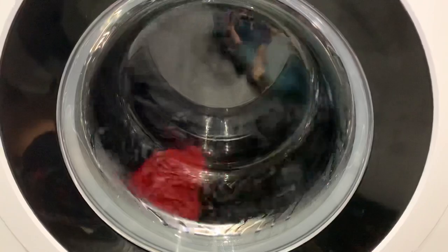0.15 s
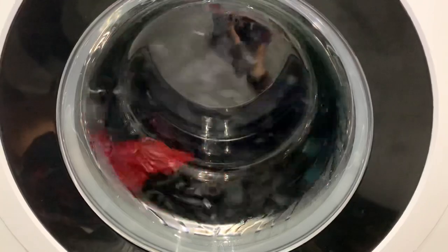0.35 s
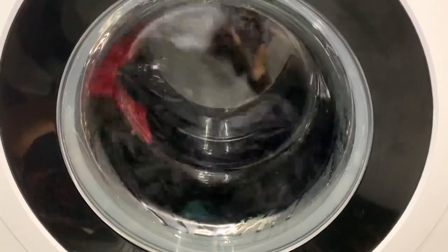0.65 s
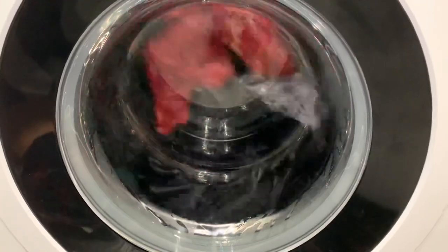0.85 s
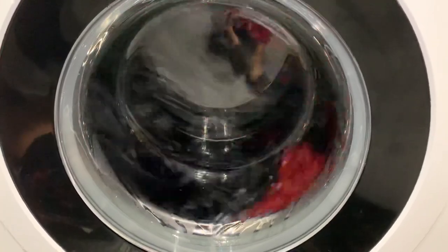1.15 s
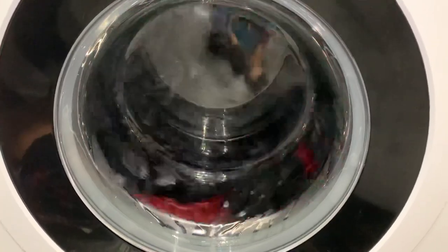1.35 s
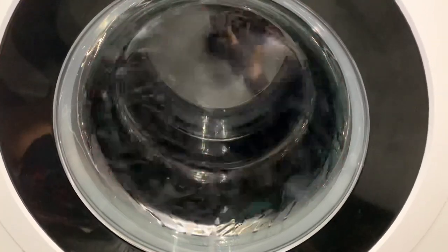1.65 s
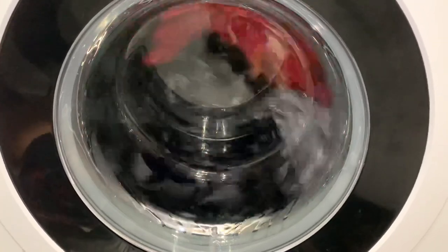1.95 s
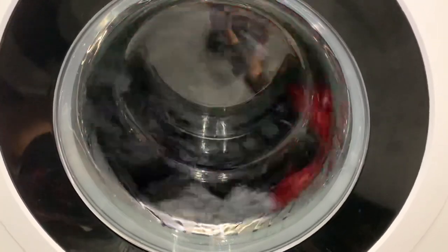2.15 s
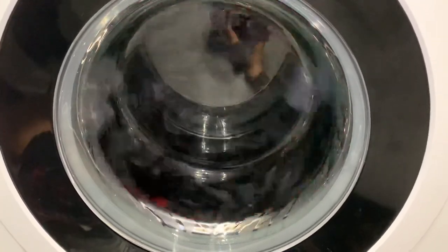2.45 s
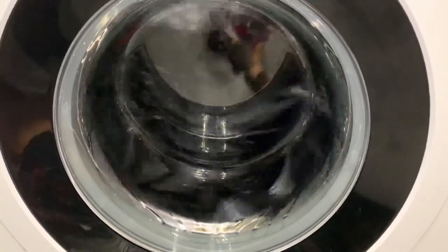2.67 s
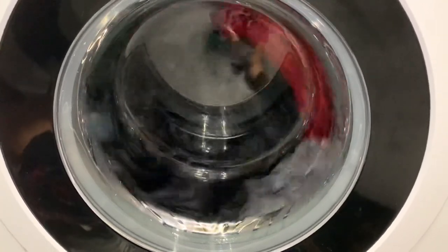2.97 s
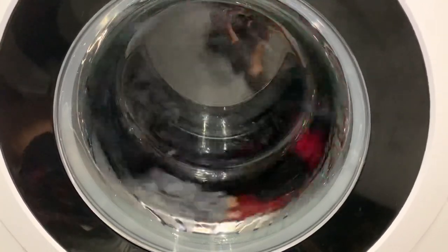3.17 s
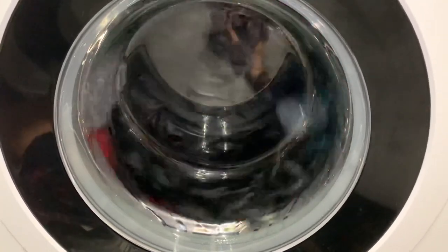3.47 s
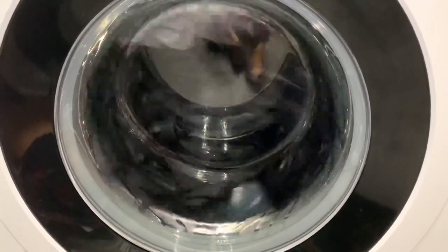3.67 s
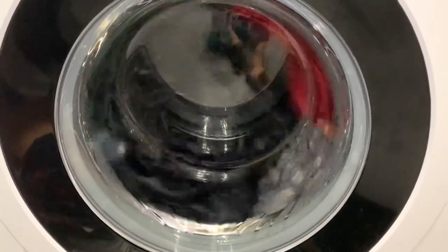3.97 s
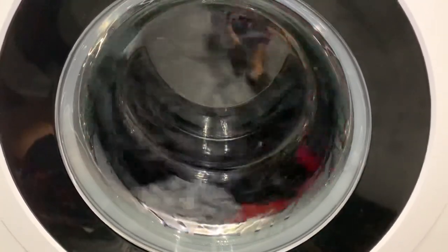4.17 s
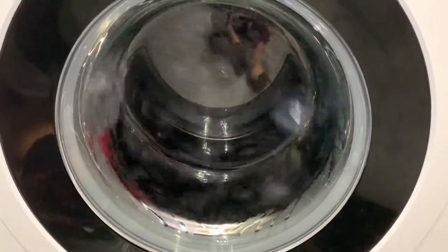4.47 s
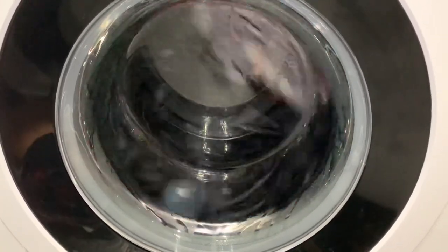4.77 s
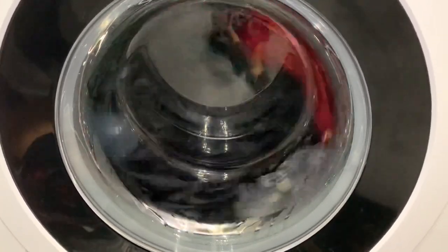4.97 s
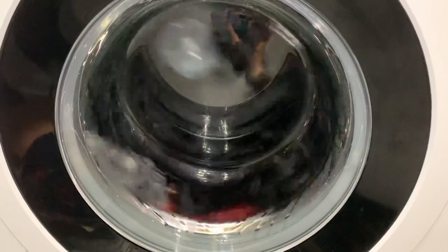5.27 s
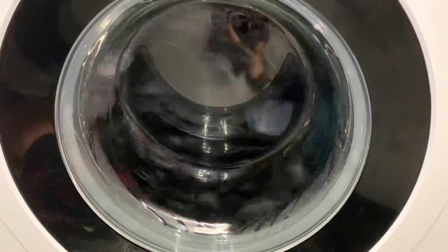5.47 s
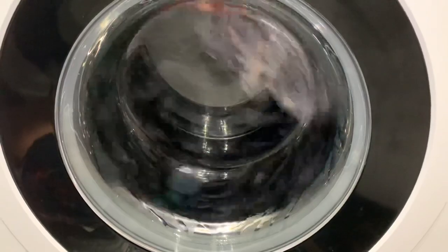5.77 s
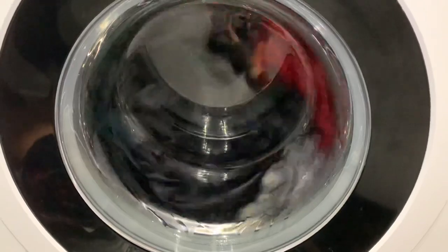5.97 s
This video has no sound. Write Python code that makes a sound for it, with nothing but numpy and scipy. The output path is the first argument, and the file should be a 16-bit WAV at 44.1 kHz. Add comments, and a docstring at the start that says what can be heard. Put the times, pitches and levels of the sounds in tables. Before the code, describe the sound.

A washing machine drum turns wet laundry, water sloshing and cloth flopping while something hard knocks sharply on the door glass about once a second.

```python
"""A front-loading washing machine turns a wet load, heard close to the door in a small hard room.
About once a second a hard fastening knocks on the door glass, exciting damped modes of glass, frame and tub,
and later clicks against it higher up. Wet laundry flops and slaps as shaped noise with gulping air pockets;
water sloshes as uneven noise with ringing bubbles, over the low-passed noise of the rumbling drive.
Short tinks, rustles and squeaks come from zips, buttons and cloth; a faint hiss is steady."""
import sys
import numpy as np
from scipy import signal
from scipy.fft import rfft, irfft, next_fast_len
from scipy.io import wavfile
from scipy.ndimage import uniform_filter1d, map_coordinates

SR = 44100
rng = np.random.default_rng(int(sys.argv[2]) if len(sys.argv) > 2 else 0)


def digitize_waveform(pressure):
    """Quantize a signal to 16-bit integers and store it at the path in sys.argv[1].

    Rows of a 2-D input are taken as channels; values are limited to [-1, 1].
    """
    field = np.atleast_2d(pressure).T
    bounded = np.clip(field, -1, 1)
    quanta = np.round(bounded * 32767).astype(np.int16)
    wavfile.write(sys.argv[1], SR, quanta)


N = 269892  # samples in the scene
RING_T = np.arange(int(SR * .7)) / SR  # time axis of one impact, s


def amp(db):
    """Logarithmic level: decibels to gain."""
    return 10 ** (np.asarray(db) / 20)


def unit(x):
    """Root-mean-square level: scale to rms 1."""
    return x / np.sqrt(np.mean(x ** 2) + 1e-20)


def blow(x, count=441):
    """Short-time level: scale so that the loudest stretch of count samples has rms 1."""
    power = np.mean(np.atleast_2d(x) ** 2, axis=0)
    return x / np.sqrt(uniform_filter1d(power, count, mode="constant").max())


def along(points, hz):
    """Interpolation of (Hz, value) points on a logarithmic frequency axis."""
    f, v = np.transpose(points)
    return np.interp(np.log(hz + 1), np.log(f + 1), v)


def wobble(rate):
    """Slow random modulation: a smooth random curve with rate knots a second."""
    knots = rng.standard_normal(int(N * rate / SR) + 4)
    return map_coordinates(knots, [np.arange(N) * rate / SR])


def filtered(x, response):
    """Linear filtering: multiply the spectrum of x by a response of frequency."""
    n = x.shape[-1]
    m = next_fast_len(n + SR // 8)
    return irfft(rfft(x, m) * response(np.fft.rfftfreq(m, 1 / SR)), m)[..., :n]


def narrow_band(centre_hz, half_width_hz):
    """Resonant filtering: stereo noise confined near one frequency, 6 dB down at the half width."""
    white = rng.standard_normal((2, len(RING_T)))
    return filtered(white, lambda hz: 1 / (1 + ((hz - centre_hz) / half_width_hz) ** 2))


# Coherence of the two channels. Each row: frequency in Hz, left-right correlation.
CHANNEL_LIKENESS = [(60, 0.9819), (130, 0.9363), (290, 0.93645), (640, 0.3365), (1400, 0.045),
                    (6000, 0.015)]


def noise(spectrum, size, tilt_db=0):
    """Partial coherence: coloured stereo noise of rms 1, alike in the bass and unrelated in the treble."""
    def turn(hz):
        return np.arccos(np.clip(along(CHANNEL_LIKENESS, hz), -1, 1)) / 2

    def response(hz):
        colour = amp(along(spectrum, hz) + tilt_db * np.log2(hz / 1000 + 1 / 20))
        return colour * [np.cos(turn(hz)), np.sin(turn(hz))]

    mid, side = filtered(rng.standard_normal((2, size)), response)
    return unit(np.array([mid + side, mid - side]))


def fade(t60):
    """Exponential damping: a decay of 60 dB in t60 seconds."""
    return np.exp(-np.log(1000) * RING_T / t60)


def onset(attack):
    """Finite contact time: an exponential rise with time constant attack in seconds."""
    return 1 - np.exp(-RING_T / attack)


def ring(modes, attack, tilt_db=0, scatter_db=2):
    """Modal superposition: damped modes whose strengths scatter with the point that is struck."""
    out = np.zeros((2, len(RING_T)))
    for hz, db, t60, *lead in modes:
        phase = rng.uniform(0, 2 * np.pi) + sum(lead) * np.array([[.5], [-.5]])
        strength = amp(db + tilt_db * np.log2(hz) + scatter_db * rng.normal())
        out += strength * fade(t60) * np.sin(2 * np.pi * hz * RING_T + phase)
    return blow(out * onset(attack))


# Reverberation time of the room. Each row: frequency in Hz, 60 dB decay time in seconds.
ROOM_DECAY = [(100, 0.622), (400, 0.31467), (1000, 0.56056), (2000, 0.5559), (4000, 0.5766), (7000, 0.4293),
              (11000, 0.3164), (16000, 0.3024)]
# Colour of the reverberation. Each row: frequency in Hz, relative level in dB.
ROOM_TINT = [(100, -4), (400, -1.5), (1000, 4), (1420, -7), (1700, -1), (1900, 0.5), (2200, -0.5),
             (3400, -1.5), (3760, -3.5), (4100, -1), (7000, -6.5), (8500, -19.5), (10500, -5.5),
             (15500, -16)]


def in_room(x, wet_db):
    """Reverberation: convolve with a noise tail in which each frequency dies at its own speed."""
    hz, t, z = signal.stft(noise([(20, 0), (20000, 0)], len(RING_T)), SR, nperseg=256)
    decay = np.exp(-np.log(1000) * t / along(ROOM_DECAY, hz)[:, None])
    tail = signal.istft(z * decay, SR, nperseg=256)[1][:, :len(RING_T)]
    tail = filtered(tail / np.linalg.norm(tail[0]), lambda f: amp(along(ROOM_TINT, f)))
    tail = tail * onset(0.001883)
    return x + amp(wet_db) * signal.fftconvolve(x, tail, axes=1)[:, :len(RING_T)]


def add(track, s, x):
    """Superposition: mix x into the track at s seconds."""
    part = track[:, max(round(s * SR), 0):][:, :x.shape[1]]
    part += x[:, :part.shape[1]]


# Once a turn the load drops and sends a surge through the tub.
# Each row: start in seconds, surge in dB.
LOAD_DROPS = [(1.56, 1), (2.52, 3.5), (3.5, 2.5), (4.48, 1.5), (5.42, 2.5)]
SURGE_ATTACK_S, SURGE_HOLD_S, SURGE_RELEASE_S = 0.021, 0.59004, 0.04


def surges():
    """Level envelope in dB: at each drop of the load the swell rises quickly, holds and falls back."""
    corners = np.cumsum([0, SURGE_ATTACK_S, SURGE_HOLD_S, SURGE_RELEASE_S])
    t = np.arange(N) / SR
    return sum(db * np.interp(t - s, corners, [0, 1, 1, 0]) for s, db in LOAD_DROPS)


# Spectrum of the drive. Each row: frequency in Hz, relative dB per Hz.
DRIVE_SPECTRUM = [(15, -23.5), (25, -21.5), (45, 1), (62, 2), (78, 10), (100, 8), (135, -4), (175, 1),
                  (220, -24.5), (300, -38.5), (500, -120)]
# Bass level, which builds as the drum gets going. Each row: time in seconds, level in dB.
DRIVE_LEVEL = [(0, -62.5), (.85, -64), (1.0, -47.5), (1.1, -48.5), (1.22, -54.5), (1.4, -53.5), (3.8, -56),
               (4.301, -54.5), (4.65, -51), (6.12, -51)]
RUMBLE_SURGE_SHARE = 0.5845  # dB of swell per dB of surge


def rumble(surge_db):
    """Broadband machine noise: the drive rumbles in the bass and swells with the load."""
    level_db = np.interp(np.arange(N) / SR, *np.transpose(DRIVE_LEVEL))
    return amp(level_db + RUMBLE_SURGE_SHARE * surge_db + 1.3 * wobble(9)) * noise(DRIVE_SPECTRUM, N)


def patchy(x, depth_db, size=7, count=5):
    """Time-varying filtering: gain wanders in patches of time and frequency, as folds of cloth shift."""
    z = signal.stft(x, nperseg=512)[2]
    field = rng.standard_normal(z.shape[1:])
    for axis, width in ((0, size), (0, size - 2), (1, count), (1, count - 2)):
        field = uniform_filter1d(field, width, axis)
    return signal.istft(z * amp(depth_db * unit(field)), nperseg=512)[1][:, :N]


def hollow(x, depth_db, count=700):
    """Cavity resonance: the closed tub colours the water with many fixed, closely spaced ripples."""
    ripple = rng.standard_normal(count)
    places = np.linspace(0, 1, count)
    return filtered(x, lambda hz: amp(depth_db * np.interp(np.sqrt(hz / (SR / 2)), places, ripple)))


def bubbles(centre_hz, spread, size_db, rise, count):
    """Bubble resonance: air pockets squeezed out of the cloth ring briefly and rise in pitch."""
    out = np.zeros((2, N))
    t = RING_T[:SR // 16]
    draws = zip(rng.uniform(0, N / SR, count), rng.normal(size=count),
                rng.exponential(size=count), rng.normal(size=count))
    for when, pitch, size, side in draws:
        hz = np.clip(centre_hz * np.exp(spread * pitch), 200, 5000)
        age = t * hz / 7
        phase = 2 * np.pi * hz * t * (1 + rise * np.minimum(age, 4))
        tone = np.sin(phase) * np.exp(-age) * (1 - np.exp(-6 * age))
        # the small high ones are weaker
        level_db = size_db * min(size, 3) - 10.254 * np.log2(1 + (hz / centre_hz / 1.0657) ** 2)
        add(out, when, amp(level_db + 2 * side * np.array([[1], [-1]])) * tone)
    return unit(out)


# Spectrum of the moving water. Each row: frequency in Hz, relative dB per Hz.
WATER_SPECTRUM = [(82, -40), (140, -9), (171, -3), (212, -6), (413, -1), (586, -5), (935, -6.5),
                  (1300, -11), (1490, -14.5), (2900, -29), (3150, -25), (5650, -41.5), (6670, -45.5),
                  (7500, -45.5), (9750, -99), (16500, -120)]
# How hard the water is stirred; the load slips once, then the drum gets going.
# Each row: time in seconds, reference level in dB.
STIRRING = [(0, -59.5), (.38, -54.5), (.6, -65), (.76, -57), (0.979, -48.5), (1.3, -53), (1.65, -45.5),
            (2.8, -48.5), (3.25, -50), (4.3, -48), (5.0, -47), (6.12, -46)]
# levels against the stirring, dB; the spray swells by its own share, in dB per dB of surge
SLOSH_DB, BUBBLES_DB, FROTH_DB, SPRAY_DB, SPRAY_SWELL = -2, -8, -18, -16.5, 0.8224


def water(surge_db):
    """Turbulent flow noise: slosh in uneven surges, with bubbles, fine froth and a fine spray."""
    stir_db = np.interp(np.arange(N) / SR, *np.transpose(STIRRING))
    lapping = wobble(21)
    flow = hollow(patchy(noise(WATER_SPECTRUM, N), depth_db=2.1093), depth_db=3.0)

    def upper(hz):  # crossover at about 1800 Hz
        return 1 / (1 + (1800 / (hz + 1)) ** 4)

    body = unit(filtered(flow, lambda hz: 1 - upper(hz)) * amp(1.3 * lapping + 1.7 * wobble(70)))
    spray = unit(filtered(flow, upper) * amp(lapping + 0.69 * wobble(97)))
    froth = bubbles(centre_hz=2200, spread=.3, size_db=1.6, rise=.004, count=3200)
    froth = unit(froth * amp(2.0 * lapping))
    large = bubbles(centre_hz=804.53, spread=.6, size_db=2.5, rise=0.014246, count=1300)
    slosh = amp(SLOSH_DB) * body + amp(BUBBLES_DB) * large + amp(FROTH_DB) * froth
    # the surge lifts slosh, bubbles and froth in full, and the spray a little less
    spray = amp(SPRAY_DB + SPRAY_SWELL * surge_db) * spray
    return amp(stir_db) * (amp(surge_db) * slosh + spray)


def churn():
    """Common modulation: the same surges swell the drive and the water."""
    surge_db = surges()
    return rumble(surge_db) + water(surge_db)


# Spectrum of the steady hiss. Each row: frequency in Hz, relative dB per Hz.
HISS_SPECTRUM = [(1000, -21), (4000, -6), (7000, 3.5), (8300, -8.5), (9000, -4.5), (9900, 11.5), (12200, 3),
                 (13600, -4.5), (15300, 6), (16300, -4.5)]


def hiss():
    """Stationary noise: a faint hiss of constant level."""
    return amp(-80.0) * noise(HISS_SPECTRUM, N)


STRIKE_SCATTER_DB = 1.5  # spread of mode strengths from strike to strike
# Modes of the steel drum, damped by the load.
# Each row: frequency in Hz, relative level in dB, 60 dB decay time in seconds.
DRUM_MODES = [(1430, -3, .02), (1845, -2, .02), (2280, -3, .015), (3090, -6, .015), (3700, -4, .018),
              (5000, -2, .015), (6700, -2, .018), (10300, -10, .01), (12400, -15, .01)]
# Spectrum of the scratch at each touch. Each row: frequency in Hz, relative dB per Hz.
SCRATCH_SPECTRUM = [(600, -9.5), (1500, 5), (3200, -14.5), (5000, -10), (6700, -21), (8300, -26),
                    (10500, -9), (12500, -28), (16000, -29)]


def tink(tilt_db, scatter_db, count=3):
    """Repeated impact: a small fastening chatters drily on steel, a scratch and a short ring each touch."""
    out = np.zeros((2, len(RING_T)))
    gaps = rng.uniform(.003, 0.007, count)
    for k, when in enumerate(np.cumsum(gaps) - gaps[0]):
        modes = [(hz * (1 + .012 * rng.normal()), db, t60, rng.uniform(-1, 2.7))
                 for hz, db, t60 in DRUM_MODES]
        scratch = noise(SCRATCH_SPECTRUM, len(RING_T), tilt_db) * fade(0.02035) * onset(0.00074)
        touch = ring(modes, 0.000616, tilt_db, scatter_db) + blow(scratch)
        add(out, when, amp(-4.5 * k) * touch)
    return blow(out)


# The clearest tinks deep in the steel drum.
# Each row: start in seconds, level in dB, treble tilt in dB per octave.
CLEAR_TINKS = [(.088, -65, -9), (0.203, -60, 0), (0.325, -59.5, -9.5), (0.704, -56.5, 2), (0.725, -57.5, 0),
               (0.766, -56.5, -5), (0.799, -58, 2.5), (.814, -63.5, 4), (.835, -61, -1),
               (0.866, -48.5, -8.5), (.915, -59, -4), (.959, -53, -1), (.975, -59, 0.5), (1.062, -52.5, 2),
               (1.083, -62, -2), (1.289, -62, 0.5), (1.799, -57.5, 5), (2.168, -56, -0.5), (2.65, -61, 0),
               (4.165, -71, 4.5), (5.566, -56, -1.5), (6.008, -54, 0.5)]


def rattle(count=12):
    """Impact excitation: zips and buttons touch the drum in clear tinks, with count faint ones at random."""
    out = np.zeros((2, N))
    for s, db, tilt_db in CLEAR_TINKS:
        add(out, s, amp(db) * in_room(tink(tilt_db, STRIKE_SCATTER_DB), wet_db=-0.5))
    for when, size in zip(rng.uniform(0, N / SR, count), rng.normal(size=count)):
        add(out, when, amp(-68.5 + 2 * size) * tink(tilt_db=1.5, scatter_db=2.2))
    return out


# Wet cloth chirps against the rubber door seal. Each row: start in seconds, level in dB.
SEAL_CHIRPS = [(.18, -85), (.515, -64), (0.773, -58.5), (0.899, -58.5), (1.214, -60.5), (1.598, -61)]
SQUEAK_HZ, SQUEAK_HALF_WIDTH_HZ, SQUEAK_S = 3087.8, 63.8, 0.02042


def squeaks():
    """Stick-slip friction: a narrow, rough tone on the seal that swells and stops."""
    out = np.zeros((2, N))
    stroke = np.sin(np.pi * np.minimum(RING_T / SQUEAK_S, 1))
    for s, db in SEAL_CHIRPS:
        tone = narrow_band(SQUEAK_HZ, SQUEAK_HALF_WIDTH_HZ)
        add(out, s, amp(db) * in_room(blow(tone * stroke), wet_db=-7.0))
    return out


def grains(spectrum, per_s, spread_db, size=N):
    """Granular friction: tiny pops of uneven strength at random moments, each with its own place; rms 1."""
    count = int(per_s * size / SR) + 2
    when = rng.integers(0, size, count)
    strength = amp(spread_db * np.clip(rng.normal(size=count), -2, 2))
    mid, side = [np.bincount(when, strength * rng.uniform(-0.941, 1, count), size) for _ in range(2)]
    pops = np.array([mid + side, mid - side])
    burst = rng.standard_normal((2, SR // 100)) * fade(.008)[:SR // 100]
    crackle = signal.fftconvolve(pops, burst, axes=1)[:, :size]
    return unit(filtered(crackle, lambda hz: amp(along(spectrum, hz))))


# Spectral weighting of the crackle. Each row: frequency in Hz, relative dB per Hz.
RUSTLE_SPECTRUM = [(700, -21), (1800, 9), (2600, 2), (3800, 9.5), (5000, -1.5), (5900, -10), (6700, -12),
                   (8300, -20.5), (10500, -12.5), (16000, -20)]
# Cloth and zips dragged over the perforated drum.
# Each row: start in seconds, length in seconds, level in dB.
DRAGS = [(0.19, 0.03923, -74), (0.307, 0.0598, -66), (0.698, 0.07942, -68.5), (.79, 0.0676, -64.5),
         (0.863, 0.1497, -65), (1.055, 0.03365, -65)]


def rustles():
    """Sliding friction: cloth drags over the holes of the drum in a dry, uneven crackle."""
    out = np.zeros((2, N))
    for s, length, db in DRAGS:
        stroke = np.abs(np.sin(np.pi * np.minimum(RING_T / length, 1))) ** .5
        crackle = grains(RUSTLE_SPECTRUM, per_s=900, spread_db=3.5, size=len(RING_T))
        add(out, s, amp(db) * in_room(crackle * stroke, wet_db=-7.5))
    return out


# Modes of the sprung tub. Each row: frequency in Hz, relative level in dB, 60 dB decay time in seconds.
TUB_MODES = [(62.88, -4.5, 0.29), (75.77, -3.5, 0.2483), (100.39, -3.5, 0.498), (122.55, -7, 0.3895),
             (187.44, -7.5, 0.5114)]


def tub_boom(attack):
    """Mass on springs: the tub booms in a few low modes."""
    return ring(TUB_MODES, attack)


# Spectrum of wet cloth landing. Each row: frequency in Hz, relative dB per Hz.
WET_SPECTRUM = [(40, -22.5), (100, -19.5), (150, -10), (280, 0.5), (385, 5.5), (580, -19), (700, -2),
                (850, -29), (1080, -10), (1700, -28.5), (2500, -33), (3500, -45), (6500, -55.5),
                (9000, -89), (14000, -80.5)]
# Wet laundry landing. Each row: start in seconds, level in dB, treble tilt in dB per octave,
# pitch of the trapped air pocket in Hz.
LANDINGS = [(0.219, -52, -10.5, 313.2), (.402, -33, 3, 355.3), (0.935, -32.5, 1.5, 394.1),
            (1.345, -48.5, 5.5, 432), (1.489, -47, 7, 429.4), (1.612, -32.5, 2.5, 287.9),
            (1.681, -36.5, -2.5, 466.2), (2.535, -31.5, 0, 684.9), (3.661, -46.5, 4.5, 470.4),
            (3.915, -41, 5.5, 396.7), (4.03, -44, 6, 365.6), (4.693, -44.5, 1.5, 399.6),
            (5.025, -47.5, 7, 361.6), (5.425, -40, 4, 349.9), (5.655, -43, 5, 1117),
            (5.901, -43.5, 5, 469.9)]
FLOP_SWELL_S = 0.013255
FLOP_BOOM_DB = -20  # the sprung tub answers each landing


def flops():
    """Soft impact: the push of wet cloth swells and dies in the hollow tub, and a pocket of air gulps."""
    out = np.zeros((2, N))
    push = np.sqrt(RING_T / FLOP_SWELL_S) * np.exp(-RING_T / FLOP_SWELL_S / 1.2722)
    for s, db, tilt_db, pocket_hz in LANDINGS:
        slap = in_room(blow(noise(WET_SPECTRUM, len(RING_T), tilt_db) * push), wet_db=-1.5)
        pocket = ring([(pocket_hz, 0, .035), (pocket_hz * 0.96, -3, .03)], attack=FLOP_SWELL_S)
        boom = amp(FLOP_BOOM_DB) * tub_boom(attack=0.014)
        add(out, s, amp(db) * (slap + amp(-3.0) * pocket + boom))
    return out


# Spectrum of cloth on glass. Each row: frequency in Hz, relative dB per Hz.
SLAP_SPECTRUM = [(30, -46), (100, -25.5), (370, 17), (560, 12), (800, 5.5), (1120, 9.5), (1500, -10),
                 (1900, -13), (2700, -17.5), (3500, -35), (8000, -67.5), (16000, -69.5)]
# Sharp wet slaps of cloth on the glass.
# Each row: start in seconds, level in dB, treble tilt in dB per octave.
CLOTH_SLAPS = [(0.404, -37, 6.5), (.941, -38.5, 3), (1.6175, -41, 11.5), (1.624, -34, 4), (1.651, -45, 9),
               (2.534, -39, 3), (2.541, -28.5, -2.5), (2.547, -28, -9), (2.657, -47.5, -1.5),
               (3.416, -26.5, 0.5), (4.436, -28.5, 3.5), (4.466, -29.5, 6.5), (5.007, -43, -4.5),
               (5.328, -29, 9)]


def slaps():
    """Distributed impact: a sodden fold peels onto the glass, a noise burst with a fast random flicker."""
    out = np.zeros((2, N))
    for s, db, tilt_db in CLOTH_SLAPS:
        flicker = amp(2.519 * wobble(754.83)[:len(RING_T)])
        crackle = noise(SLAP_SPECTRUM, len(RING_T), tilt_db) * flicker * fade(0.04544) * onset(0.002616)
        add(out, s, amp(db) * in_room(blow(crackle), wet_db=-8))
    return out


# Larger air pockets that gulp on their own. Each row: start in seconds, level in dB, pitch in Hz.
AIR_POCKETS = [(0.797, -48, 334.6), (3.667, -43.5, 485.5)]


def gulps():
    """Air-cavity resonance: a larger pocket of air escapes with one round note."""
    out = np.zeros((2, N))
    for s, db, hz in AIR_POCKETS:
        add(out, s, amp(db) * in_room(ring([(hz, 0, .05)], attack=0.01264), wet_db=0))
    return out


# Modes of the door glass. Each row: frequency in Hz, relative level in dB, 60 dB decay time in seconds,
# phase lead of the left channel in radians.
GLASS_MODES = [(731.15, -16, 0.15244, 0.5), (848.5, -24, 0.011, -3.5), (925, -4, 0.0298, -1.5),
               (959.8, -15, 0.03567, -1.5), (1137.4, -3, 0.03199, 7.5), (1253.4, -3.5, 0.05509, -1.5),
               (1435.5, 12.5, 0.03258, 1), (1640, -21, 0.0051, -12), (1809.5, -1, 0.02422, -6.5),
               (1911.5, -2.5, 0.03886, -0.5), (2076.4, -12.5, 0.0787, -4.5), (2248.6, -2, 0.02037, 5.5),
               (2554.5, -8, 0.0299, -2), (3220, -28, 0.045, 4), (3644.3, -11, 0.0464, 7.5),
               (3780, -13, 0.02807, -5), (4402.8, -19.5, 0.0151, 1), (5514.2, -30.5, 0.022, 5),
               (5073.5, -32.5, 0.01151, -3), (6751.9, -25.5, 0.037, 1.5), (10355, -35.5, 0.00982, -5),
               (14500, -48.5, 0.018, 14)]


def glass_ring(attack, tilt_db, scatter_db=2, longest_t60=np.inf):
    """Plate vibration: the door glass rings in its modes, none longer than longest_t60 seconds."""
    modes = [(hz, db, min(t60, longest_t60), lead) for hz, db, t60, lead in GLASS_MODES]
    return ring(modes, attack, tilt_db, scatter_db)


# Spectrum of the sharp tick. Each row: frequency in Hz, relative dB per Hz.
TICK_SPECTRUM = [(500, -36), (1400, -47), (2400, -3), (4000, -5), (7000, 2.5), (8400, -6.5), (10300, 10.5),
                 (12300, 5.5), (13600, 1.5), (15200, 7), (16500, 3.5)]
# Modes of the metal fastening.
# Each row: frequency in Hz, relative level in dB, 60 dB decay time in seconds.
FASTENING_MODES = [(3680, -4, .014), (4300, -7, .008), (5030, 0, .016), (5350, -4, .01), (6300, -5, .012),
                   (6690, -5, .016)]


def click(tilt_db, metal_db):
    """Short contact time: a light touch rings the fastening and the high modes of the glass."""
    tick = blow(noise(TICK_SPECTRUM, len(RING_T), tilt_db) * fade(0.03312) * onset(0.0000751))
    # wet cloth lies against the glass and damps it
    glass = glass_ring(attack=0.0037, tilt_db=21 + tilt_db, longest_t60=.022)
    metal = ring(FASTENING_MODES, attack=0.001606, scatter_db=STRIKE_SCATTER_DB)
    return in_room(blow(tick + amp(-6.5) * glass + amp(metal_db) * metal), wet_db=-1.0)


def after_ring(centre_hz, half_width_hz, t60):
    """Beating: a narrow band of noise fades with the roughness of a tight cluster of modes."""
    return blow(narrow_band(centre_hz, half_width_hz) * fade(t60) * onset(0.00019))


# Spectrum of the crack and the skid. Each row: frequency in Hz, relative dB per Hz.
CRACK_SPECTRUM = [(40, -30), (200, -9), (600, -3), (1400, 13.5), (2000, 3), (3000, -30), (4000, -3.5),
                  (5500, -19), (8500, -36.5), (10500, -29.5), (16000, -81.5)]
# Modes of the door frame. Each row: frequency in Hz, relative level in dB, 60 dB decay time in seconds.
FRAME_MODES = [(299.21, -22.5, 0.4799), (355.96, -4.5, 0.10088), (382.28, 0, 0.08175),
               (475.63, -7.5, 0.03943), (537.33, -10, 0.08443)]
# Knocks on the door, with their small rebounds and lingering rings.
# Each row: start in seconds, glass level in dB, door frame level in dB, tub boom level in dB,
# hardness as treble tilt in dB per octave, sharp tick level in dB, then the metallic after-ring:
# centre in Hz, half width in Hz, level in dB, 60 dB decay time in seconds.
DOOR_KNOCKS = [(1.528, -45, -36, -31, -20, -42, 2435, 149.8, -49, 0.3491),
               (2.469, -34.5, -32, -38, -12, -43, 2474, 250, -49, 0.2005),
               (3.4134, -14, -25, -31, 2.5, -24.5, 3760, 109.2, -25.5, 0.1167),
               (3.425, -22.5, -31, -50, 1, -50, 1856, 130, -26, 0.2779),
               (3.4413, -35.5, -54.5, -43.5, 10, -55.5, 2424, 130, -33, 0.1091),
               (3.456, -41, -45, -40, 1.5, -59, 3751, 44.93, -43, 0.53),
               (3.472, -37, -43.5, -43.5, -3, -62.5, 1893, 89.7, -32.5, 0.369),
               (4.4335, -16.5, -24, -33.5, -2, -29, 2658, 329.5, -32.5, 0.1377),
               (4.4643, -26, -26, -31.5, -2.5, -34, 1830, 69.87, -34.5, 0.392),
               (4.825, -44.5, -54.5, -46, 0, -36.5, 5081, 200, -38.5, 0.04803),
               (5.3267, -14.5, -32.5, -42, 0.5, -35, 3684, 79.76, -29, 0.0269),
               (5.333, -32.5, -43.5, -46.5, -7, -48.5, 4446, 119.9, -40.5, 0.258),
               (5.3698, -24, -45, -56.5, -2.5, -42.5, 1988, 129.8, -38.5, 0.1882),
               (5.413, -34.5, -47, -67, 6, -62, 1970, 149.9, -45.5, 0.201)]
KNOCK_TICK_TILT_DB = -10.5  # per octave


def knocks():
    """Coupled modes: a contact skids, cracks on the glass, jolts the frame and booms in the tub."""
    out = np.zeros((2, N))
    for (s, glass_db, frame_db, boom_db, tilt_db, tick_db,
         ring_hz, half_width_hz, ring_db, ring_t60) in DOOR_KNOCKS:
        crack = blow(noise(CRACK_SPECTRUM, len(RING_T), tilt_db) * fade(0.05458) * onset(0.00021))
        glass = glass_ring(attack=0.002202, tilt_db=tilt_db, scatter_db=STRIKE_SCATTER_DB)
        glass = amp(glass_db) * blow(glass + amp(-13.0) * crack)
        frame = amp(frame_db) * ring(FRAME_MODES, attack=0.000869, scatter_db=STRIKE_SCATTER_DB)
        boom = amp(boom_db) * tub_boom(attack=0.007234)
        add(out, s, in_room(glass, wet_db=-6.0) + in_room(frame, wet_db=-1.5) + boom)
        add(out, s, amp(tick_db) * click(KNOCK_TICK_TILT_DB, metal_db=-13.0))
        # which modes ring on depends on how the fastening strikes
        metallic = amp(ring_db) * after_ring(ring_hz, half_width_hz, ring_t60)
        add(out, s, in_room(metallic, wet_db=-9.5))
        # the fastening skids up the glass before it catches: a decay played backwards, ending at the knock
        skid = blow(noise(CRACK_SPECTRUM, len(RING_T), tilt_db=2.5) * fade(0.03292))[:, ::-1]
        add(out, s - RING_T[-1], amp(glass_db - 18.0) * skid)
    return out


# Sharp clicks higher up the glass, mostly about .4 s after a knock. Each row: start in seconds,
# level in dB, treble tilt in dB per octave, metal ring against the tick in dB.
GLASS_CLICKS = [(1.8756, -29.5, 1, -12), (1.885, -39.5, -3.5, -8), (2.8068, -34.5, 0.5, -13),
                (3.1943, -59, -6.5, -10), (3.7953, -31, -1.5, -12), (3.801, -33, -2.5, -20),
                (4.139, -60, -5.5, -5.5), (4.195, -60.5, -2.5, -8.5), (4.802, -36, 0, -14.5),
                (4.8235, -30.5, 0.5, -19.5), (5.778, -37, -1.5, -9), (5.8167, -35, -4, -10)]


def clicks():
    """Light impact: carried up by the drum, the fastening touches the glass again, often twice."""
    out = np.zeros((2, N))
    for s, db, tilt_db, metal_db in GLASS_CLICKS:
        add(out, s, amp(db) * click(tilt_db, metal_db))
    return out


def scene():
    """Superposition: all sounds of the turning drum, over a faint steady hiss."""
    background = churn() + hiss()
    fastenings = rattle() + knocks() + clicks()
    laundry = squeaks() + rustles() + flops() + slaps() + gulps()
    return background + fastenings + laundry


TOP_HZ = 16300  # band limit, 6 dB down


def record(dry):
    """Band limitation: the microphone rolls off the deep bass, the recorder cuts steeply above its limit."""
    thinned = signal.sosfilt(signal.butter(2, 40, "highpass", fs=SR, output="sos"), dry)
    return filtered(thinned, lambda hz: 1 / (1 + (hz / TOP_HZ) ** 120))


dry = scene()
out = record(dry)
digitize_waveform(out)
```